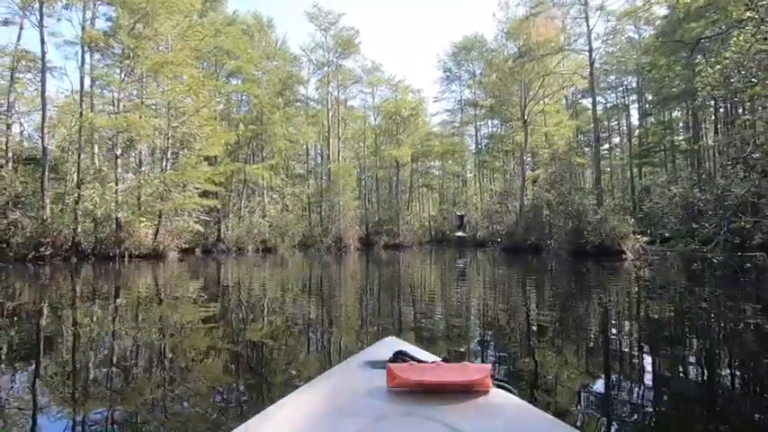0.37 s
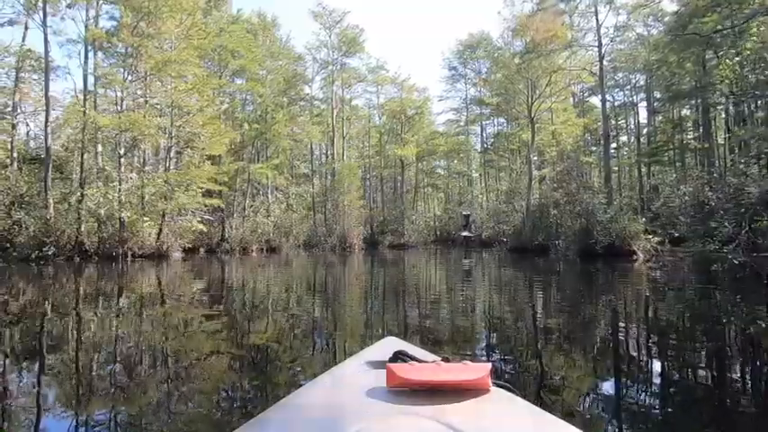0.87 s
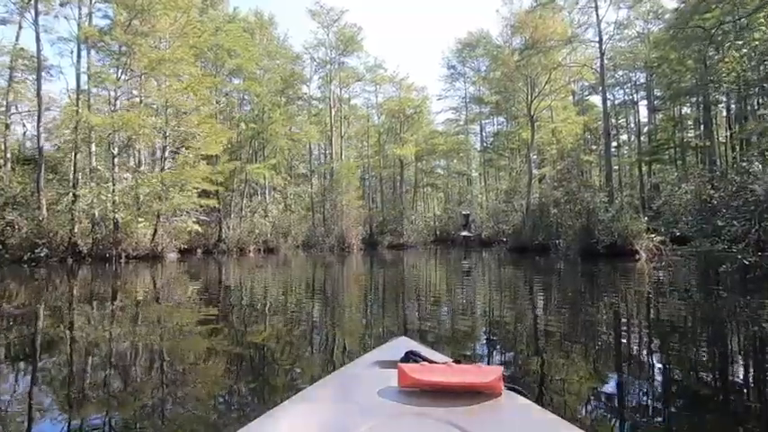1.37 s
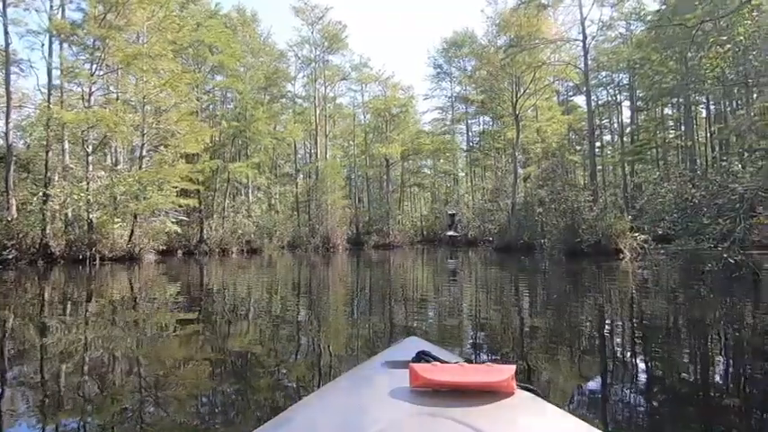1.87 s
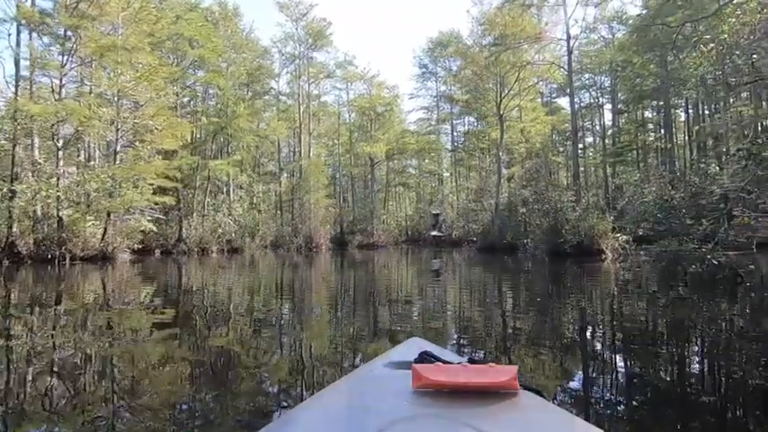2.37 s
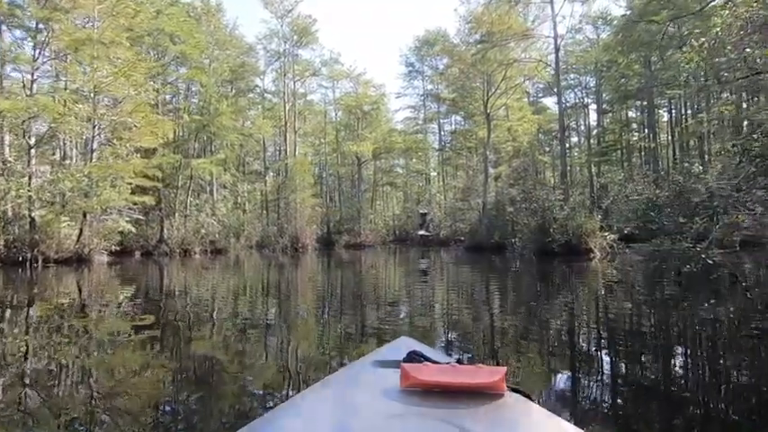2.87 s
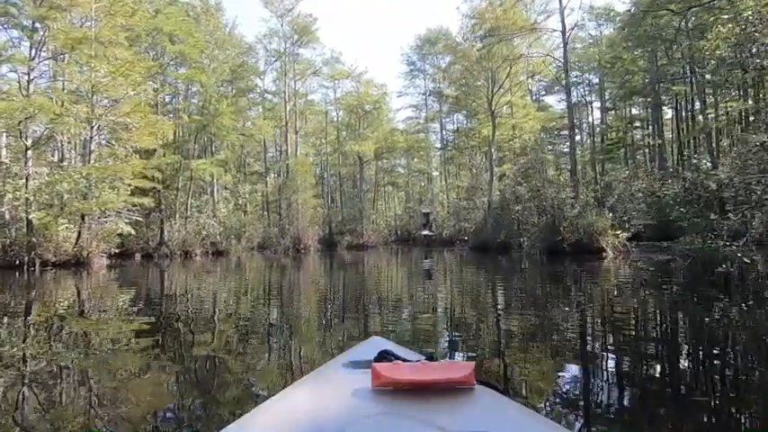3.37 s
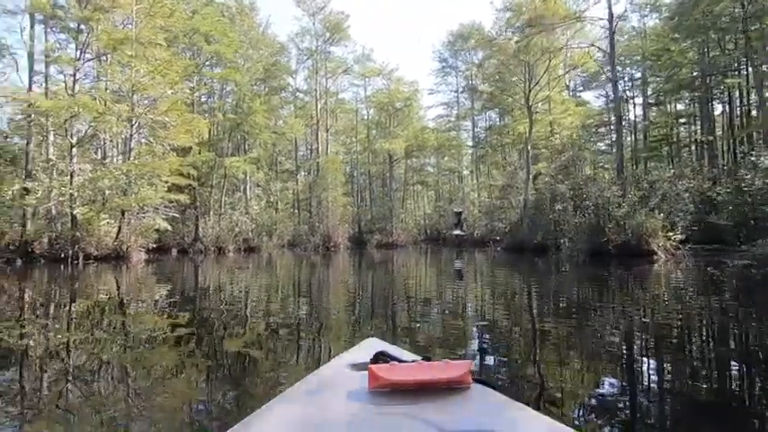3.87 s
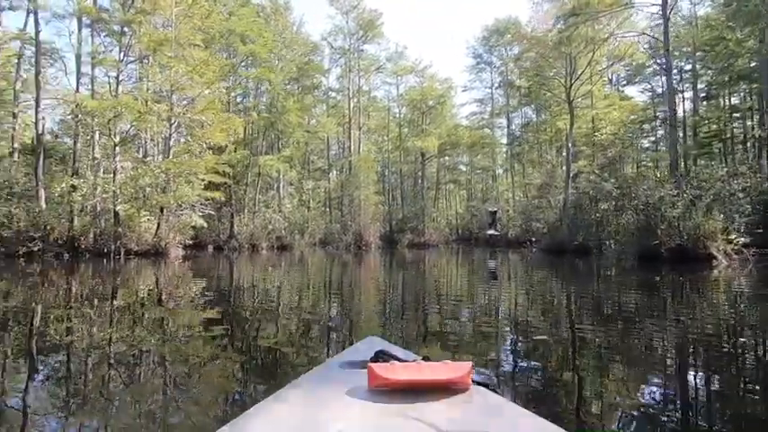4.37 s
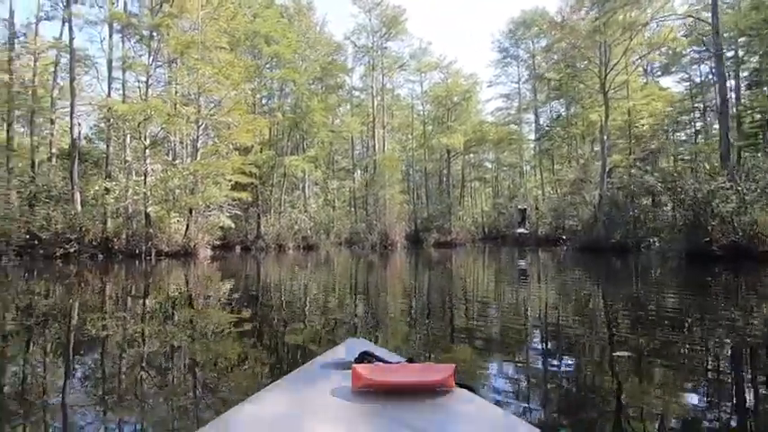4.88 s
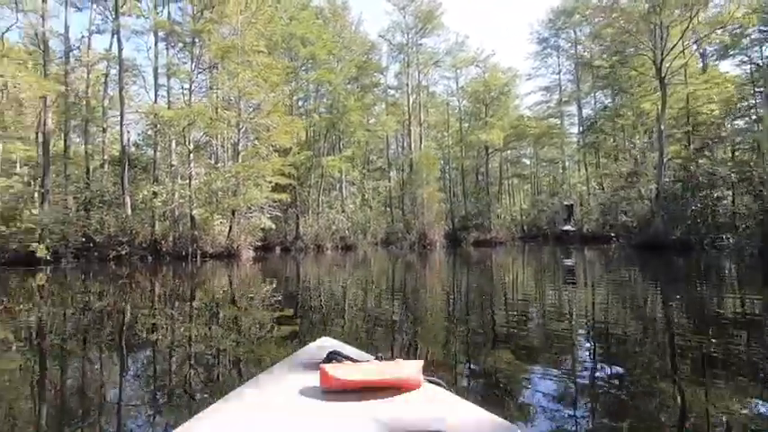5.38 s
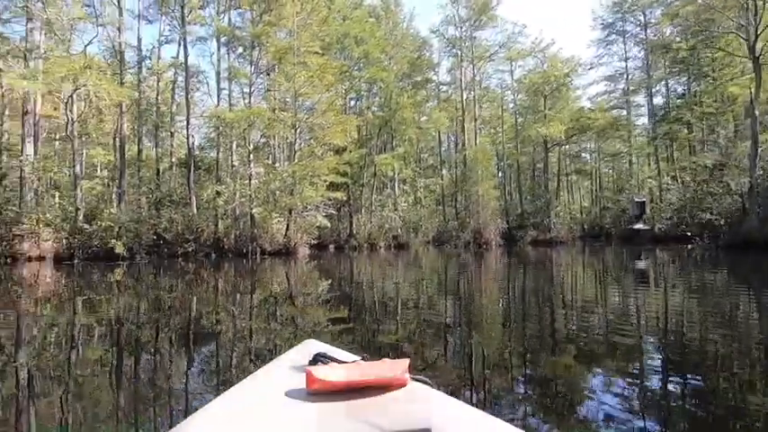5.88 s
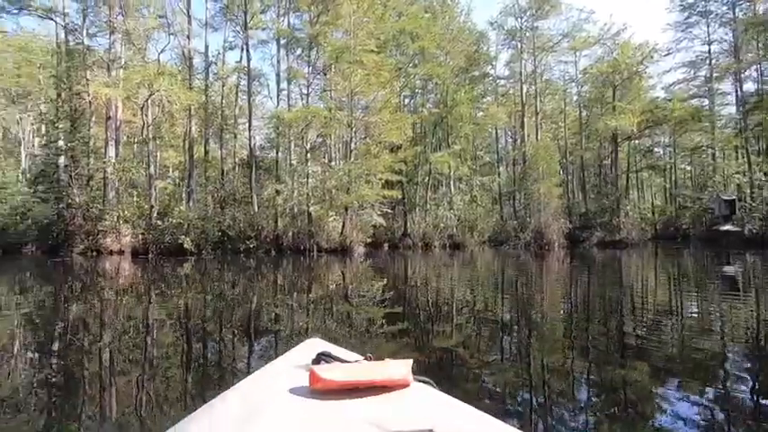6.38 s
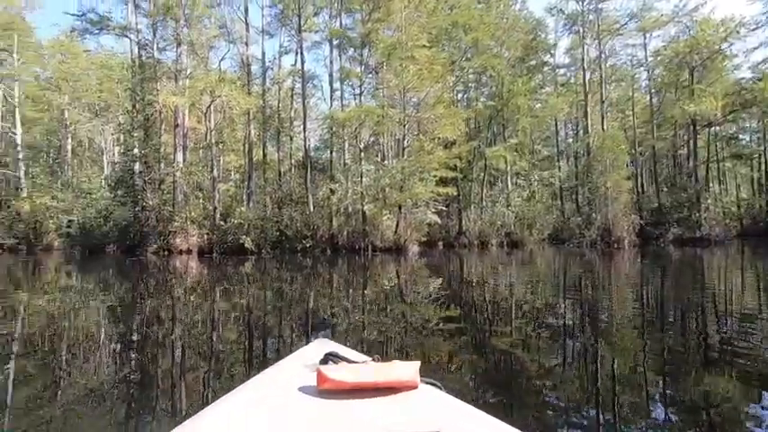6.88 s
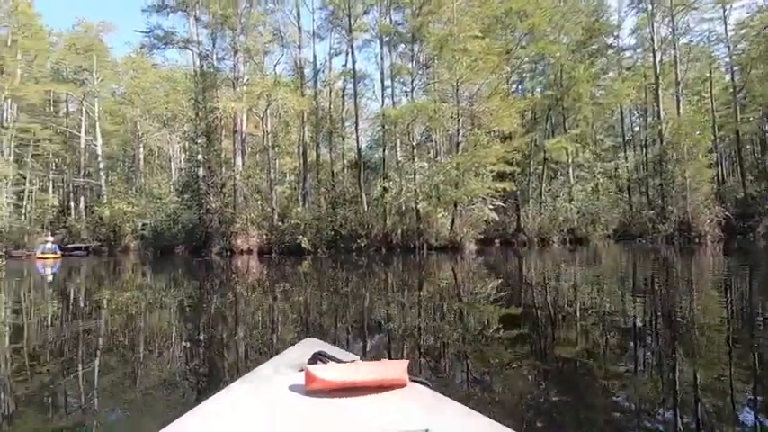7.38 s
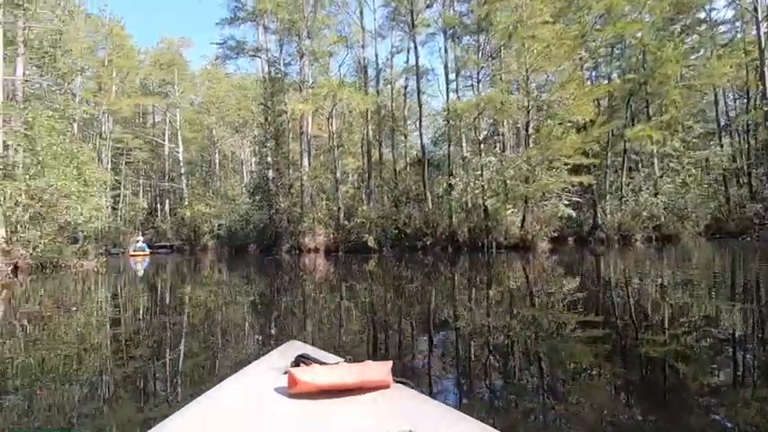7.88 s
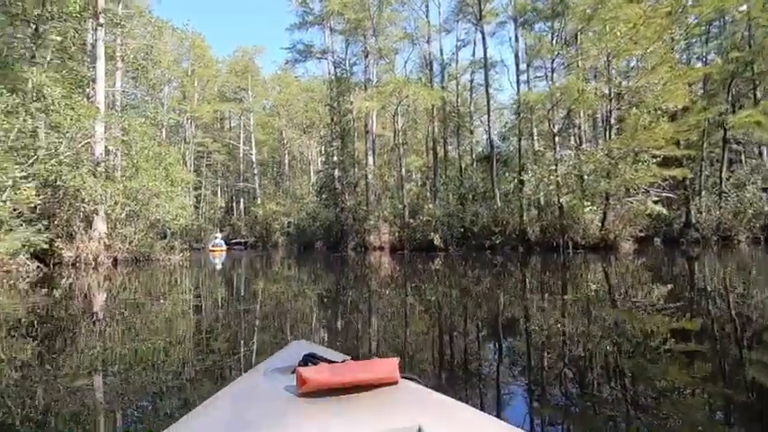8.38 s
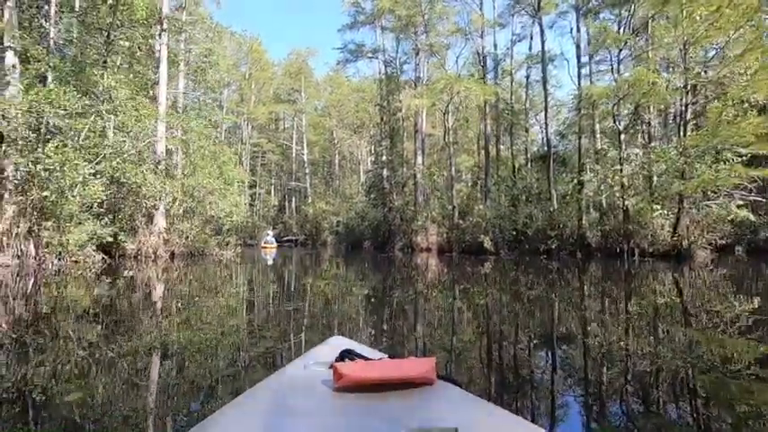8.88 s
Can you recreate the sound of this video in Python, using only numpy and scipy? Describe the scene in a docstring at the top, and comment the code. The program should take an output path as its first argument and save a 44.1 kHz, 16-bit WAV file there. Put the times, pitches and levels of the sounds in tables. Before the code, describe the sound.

Quiet low engine hum and dull rumble, then close paddle plops, bubbling swirls and scattered drips, ending with sharper splashes.

```python
"""A kayak paddle stirs, gurgles, splashes and drips in still swamp water, mostly on the right.
Bubbles are ringing sines, plops broad sagging pulses, spray and splashes clumped resonant grains.
A wash of shaped noise follows the gurgle. Two distant engines drone as near-pure orders that swell slowly,
over a dull rumble of low shaped noise; a thin, wide hiss of shaped noise hangs on top."""
import sys
import numpy as np
from scipy import signal
from scipy.fft import rfft, irfft, next_fast_len
from scipy.io import wavfile

SR = 44100
rng = np.random.default_rng(int(sys.argv[2]) if len(sys.argv) > 2 else 0)


def store_pcm(level_fs):
    """Save levels as 16-bit WAV."""
    pcm = np.round(np.clip(level_fs, -1, 1) * 32767).astype(np.int16)
    wavfile.write(sys.argv[1], SR, np.atleast_2d(pcm).T)


def amplitude_ratio(level_db):
    """Convert a level in decibels to the matching linear amplitude (field) ratio."""
    exponent = np.asarray(level_db, float) / 20
    return 10 ** exponent


N = 407484

# blade stirring the water: start_s, hold_s, gurgle_db, spray_db (gurgle before its shares)
STROKES = [(2.7, .06, -52, -59), (3.05, .18, -62, -73), (3.557, .2, -49, -58.5), (3.872, .15, -58, -62),
           (4.597, .19, -58, -61), (5.055, .13, -62, -69), (5.442, .13, -58, -74), (5.709, .39, -54, -62),
           (6.341, .1, -62, -76), (6.88, .18, -61, -67), (7.251, .19, -52.5, -99), (7.62, .1, -56.5, -93),
           (7.84, .35, -48, -56.5), (8.422, .05, -49, -54.5), (8.592, .12, -59, -62.5),
           (8.999, .2, -53, -60)]
# ripples along the hull between strokes: time_s, gurgle_db, spray_db (gurgle before its shares)
RIPPLES = [(0, -73, -98), (1.0, -71, -92), (1.9, -67, -70.5), (2.5, -65, -74), (4.3, -65, -82),
           (6.6, -65.5, -101), (9.24, -63, -90)]
# larger trapped bubbles and drops: time_s, peak_db, nominal_pitch_hz
DROPS = [(0.901, -47, 2030), (1.07, -58.5, 3200), (1.335, -58, 2840), (1.415, -56.5, 2340),
         (1.81, -54, 1120), (1.58, -51, 1900), (2.01, -55, 2070), (2.124, -43, 1880), (2.744, -45, 710),
         (2.761, -38.5, 1950), (2.763, -36, 1120), (2.776, -40.5, 2800), (2.905, -38.5, 2160),
         (2.919, -45.5, 2810), (3.037, -43.5, 925), (3.055, -48.5, 1330), (3.2, -44.5, 1800),
         (3.389, -42, 1100), (3.554, -39.5, 1630), (3.574, -39.5, 2070), (3.59, -36.5, 1910),
         (3.601, -39.5, 1240), (3.63, -37, 1360), (3.644, -36, 2070), (3.698, -37, 1110),
         (3.785, -44, 1270), (3.793, -31.5, 1290), (4.027, -38.5, 2460), (4.036, -45.5, 990),
         (4.151, -40.5, 1236), (4.645, -37.5, 1344), (4.744, -46, 525), (5.132, -40.5, 1210),
         (5.212, -45, 1340), (5.451, -50, 4040), (5.496, -39.5, 1156), (5.698, -42, 1660),
         (5.745, -43, 3080), (5.791, -41, 1250), (5.833, -42, 2600), (5.87, -48, 2670), (5.98, -41, 2110),
         (5.996, -45, 3430), (6.06, -44, 2300), (5.834, -39, 926), (5.857, -34, 1580), (5.964, -41, 1180),
         (6.046, -41, 974), (6.11, -45, 870), (7.049, -43.5, 856), (7.063, -41.5, 2260), (7.251, -33, 870),
         (7.344, -31, 1435), (7.427, -44, 785), (7.427, -35.5, 1740), (7.456, -35.5, 1145),
         (7.52, -48, 590), (7.601, -39.5, 1510), (7.629, -43.5, 1810), (7.861, -32.5, 1154),
         (7.857, -40, 2360), (7.868, -44, 2900), (7.872, -39, 1320), (7.898, -37, 1040),
         (7.909, -38.5, 1640), (7.959, -31, 1130), (7.967, -34.5, 2520), (8.03, -32.5, 1660),
         (8.057, -42, 740), (8.088, -45, 1530), (8.12, -35.5, 2910), (8.127, -28, 1566), (8.132, -34, 870),
         (8.182, -38.5, 1850), (8.431, -25, 1740), (8.435, -29, 1226), (8.441, -31, 2200),
         (8.539, -35.5, 3100), (8.997, -37.5, 723), (9.021, -43, 2900), (9.016, -40, 3900),
         (9.044, -40.5, 3660), (9.031, -44, 800), (9.116, -43, 2050), (9.164, -39, 1400)]
# hard plops: time_s, peak_db, start_pitch_hz
PLOPS = [(2.698, -31, 1500), (2.703, -30, 1100), (2.783, -23.5, 1570), (3.054, -32, 1340),
         (4.718, -41, 940), (5.064, -43, 1500), (5.075, -42, 1400), (5.1005, -26.5, 1350),
         (5.105, -24.5, 1660), (5.496, -36, 1100), (5.834, -39, 980), (7.25, -32, 2000), (7.318, -40, 1900),
         (7.34, -35, 1800), (7.426, -32.5, 910), (7.697, -39, 1650), (7.823, -34, 1400), (7.832, -24, 1980),
         (7.962, -25, 1090), (8.029, -23.5, 2200), (8.4296, -14.5, 3060), (8.432, -26, 1650),
         (8.448, -33, 1500), (9.006, -18, 3600), (9.026, -40, 2200)]
# bubbles gliding in pitch, mostly upward as they near the surface: time_s, peak_db, start_hz, end_hz, length_s
GLIDES = [(2.699, -30, 300, 420, 0.021), (2.712, -44, 390, 940, 0.068), (2.757, -38.5, 3670, 4000, 0.04),
          (2.952, -47, 500, 800, 0.023), (3.376, -51, 640, 1300, 0.042), (3.474, -49, 1667, 1830, 0.032),
          (3.687, -46, 955, 1260, 0.06), (3.788, -39, 1240, 1284, 0.042), (3.921, -48, 1990, 2320, 0.02),
          (5.938, -46.5, 837, 910, 0.062), (6.124, -50, 897, 1010, 0.059), (6.89, -45.5, 867, 890, 0.042),
          (7.339, -35.5, 950, 1500, 0.015), (7.363, -42, 1206, 2200, .024), (7.831, -37, 1730, 2510, .012),
          (7.868, -48, 544, 805, 0.07), (7.97, -43.5, 810, 860, .04), (8.034, -34, 1730, 2700, .012),
          (8.043, -44.5, 540, 740, .06), (8.133, -44, 858, 1000, 0.046), (8.434, -30, 348, 296, 0.022),
          (8.489, -39, 1204, 2320, 0.033), (8.75, -49.5, 1070, 1180, 0.037), (8.993, -43, 605, 850, 0.025)]
# blade or sheet of water breaking the surface: time_s, level_db, decay_60db_s, treble_re_body_db
SPLASHES = [(2.6992, -38.5, 0.093, -28), (2.722, -45, 0.1, -3), (2.76, -46, 0.039, -23),
            (2.789, -41.5, 0.076, -18), (3.0525, -52, 0.088, -32), (3.5526, -63, 0.094, -10),
            (4.035, -40, 0.051, -30), (5.1057, -49.5, 0.11, -40), (7.8336, -46.5, 0.43, -29),
            (7.9644, -51, 0.077, -27), (8.4248, -30.5, 0.044, -5), (8.445, -39.5, 0.068, 2),
            (8.484, -48, 0.14, 0), (8.9935, -47, 0.13, -22), (9.006, -30, 0.13, -17.5)]
# spray ticks: time_s, ping_db, centre_hz
TICKS = [(0.817, -51, 7550), (1.3394, -51, 7450), (1.6516, -53, 4650), (1.742, -45.5, 4380),
         (1.9046, -48, 8160), (2.0142, -46.5, 5000), (2.6955, -35.5, 4120), (2.7222, -51, 4130),
         (2.918, -42.5, 7500), (3.5528, -37, 8300), (3.6297, -42, 4050), (3.727, -45.5, 4660),
         (4.1579, -49, 3870), (4.577, -45, 6200), (4.6049, -48.5, 4400), (4.6242, -33.5, 8570),
         (4.7188, -41, 8800), (4.784, -36, 8040), (5.7415, -44, 4100), (5.8243, -44.5, 4800),
         (5.9403, -45, 4890), (6.0157, -45.5, 4600), (6.2907, -45, 6240), (6.7065, -46.5, 6550),
         (6.7476, -36.5, 8800), (6.8808, -48.5, 5130), (7.0652, -40.5, 9960), (7.0943, -46.5, 8500),
         (7.7707, -40, 3850), (7.856, -43.5, 4570), (7.8925, -40, 4580), (8.089, -40, 4600),
         (8.12, -42, 5070), (8.1668, -39.5, 4630), (8.287, -44.5, 5000), (8.327, -42, 7760),
         (8.4284, -26.5, 6550), (8.5302, -43, 5000), (8.9286, -50, 4900), (9.122, -47, 4030),
         (9.152, -43, 5100), (9.214, -39.5, 5130)]
# side of the paddle: time_s, left_over_right_db
PADDLE_SIDE = [(0, 4), (2.5, -0.5), (2.68, -14.5), (5, -22.5), (7.4, -23), (8.2, -18), (8.4, 7), (9.24, -1)]
# engine speeds: time_s, firing_rate_hz
SPEED_A = [(0, 36.6), (1.8, 36.62), (3.6, 36.33), (5.0, 36.4), (6.2, 36.24), (9.24, 35.04)]
SPEED_B = [(0, 22.49), (2.1, 23.01), (3.3, 23.03), (4.3, 22.86), (9.24, 20.84)]
# engine swells on the way through the air: time_s, to_third_order_db, higher_orders_db
SWELL_A = [(0, 3, 1), (0.71, -3.5, 5), (1.42, -2, 4.5), (2.84, -16.5, -4.5), (3.55, -3, 1),
           (4.26, -1.5, 2.5), (4.98, 7, 4), (5.69, 3, 2), (6.4, -1.5, 5.5), (7.11, 2.5, 7), (7.82, 2, 9.5),
           (8.53, 7, 7.5), (9.24, 9.5, -6)]
SWELL_B = [(0, 1.5, 10.5), (0.71, -1, 8.5), (1.42, -2, 3), (2.2, 0, 9.5), (2.84, 1.5, 0.5),
           (4.26, -4.5, -5), (5.3, -0.5, -14), (6.4, -12, -1), (7.11, -11, -3.5), (9.24, -4, -2)]
# engine orders: multiple_of_firing_rate
ORDERS_A = [2, 3, 4, 5, 16 / 3]
ORDERS_B = [2, 3, 4, 5, 6, 7, 9]
# order levels before swell and waver: level_db
ORDERS_A_DB = [-36.5, -39.5, -45.5, -53.5, -60]
ORDERS_B_DB = [-45, -45.5, -46, -40.5, -62.5, -52, -57]
# rumble spectrum shape: frequency_hz, density_db_per_hz
RUMBLE_SPECTRUM = [(25, -15), (45, -10.5), (70, -2.5), (110, 2.5), (160, -10), (220, -9), (320, -15.5),
                   (450, -33), (600, -35)]
# rumble level: time_s, level_db
RUMBLE_LEVEL = [(0.0, -39), (3.73, -42.5), (5.58, -37.5), (6.38, -42), (9.24, -36.5)]
# hiss spectrum shape: frequency_hz, density_db_per_hz
HISS_SPECTRUM = [(260, -18), (450, -1), (545, -7.5), (813, -1.5), (971, -5), (1470, -6.5), (3680, -28),
                 (5170, -24.5), (6750, -15), (7380, -12.5), (8180, -14.5), (9770, -11.5), (13500, -17.5),
                 (14800, -13), (15500, -34.5)]
# hiss swell over its base: time_s, gain_db
HISS_SWELL = [(0, 0.5), (2, 4.5), (5, 5.5), (9.24, 6)]

HISS_BASE_DB = -62.5
BUBBLE_SHARE_DB, WASH_SHARE_DB = -3.5, -7
ATTACK_DB_PER_S, RELEASE_DB_PER_S = 250.5, 90
RING_S, RING_CYCLES = 0.0078, 18.3  # a drop's 60 dB decay: this long plus so many cycles
PLOP_CYCLES, PLOP_SAG = 7.6, 0.14  # cycles to die by 60 dB; share of pitch lost meanwhile
PORT_HZ, PORT_WIDTH_HZ = 9840, 4000  # cavity before the left microphone


def stir():
    """Gurgle and spray levels in dB: each stroke rises, holds and dies away over the ripples."""
    t = np.arange(N) / SR
    power = amplitude_ratio(2 * np.array(in_time(RIPPLES)))
    for start_s, hold_s, gurgle_db, spray_db in STROKES:
        rise_db = -ATTACK_DB_PER_S * np.maximum(start_s - t, 0)
        fall_db = -RELEASE_DB_PER_S * np.maximum(t - start_s - hold_s, 0)
        peak_db = np.array([[gurgle_db], [spray_db]])
        power = power + amplitude_ratio(2 * peak_db) * amplitude_ratio(2 * (rise_db + fall_db))
    return 10 * np.log10(power)


def stirring(gurgle_db, spray_db):
    """Small bubbles gurgle with the stirring; fine spray crackles above."""
    spray = grains(500, 2500, 10000, cycles=30.0, spread_db=4.0)
    return gurgle(gurgle_db, count=1300) + amplitude_ratio(spray_db) * spray


def gurgle(gurgle_db, count):
    """Many small rising bubbles, born more often and louder where the water is stirred hardest."""
    out, draw = np.zeros(N), rng.random((count, 4))
    busy = np.cumsum(amplitude_ratio(1.1 * gurgle_db + 4.0 * drift(12.0)))
    born = np.searchsorted(busy / busy[-1], draw[:, 0])
    for i, (_, pitch, size, climb), shake in zip(born, draw, wobbles(count)):
        hz = 600 * 5.0 ** pitch
        level_db = 0.6 * gurgle_db[i] - 18 * size - 7.0 * pitch
        ring_s = 0.014 + 24 / hz
        add(out, i / SR, amplitude_ratio(level_db) * bubble(hz, ring_s, 0.87 * climb, shake))
    level = np.sqrt(np.mean(amplitude_ratio(gurgle_db) ** 2))
    return rms_one(out) * level * amplitude_ratio(BUBBLE_SHARE_DB)


def bubble(hz, ring_s, climb, shake):
    """A bubble swells within a few cycles and rings, rising in pitch, its wall wobbling."""
    t = np.arange(len(shake)) / SR
    phase = 2 * np.pi * np.cumsum(hz * (1 + climb * t / ring_s)) / SR + 3.34 * shake
    return np.sin(phase) * amplitude_ratio(-60 * t / ring_s) * (1 - np.exp(-t * hz / 2.2))


def wobbles(count):
    """Slow phase noise of bubble walls, one 60 ms row a bubble."""
    noise = rng.standard_normal((count, round(0.06 * SR)))
    return signal.lfilter([0.03], [1, -0.97], noise)


def splashes():
    """Short grains in a body and a treble band, gated on within a few milliseconds and dying away."""
    gate, bright = np.zeros(N), np.zeros(N)
    t = np.arange(round(0.15 * SR)) / SR
    for s, db, decay_s, treble_db in SPLASHES:
        burst = amplitude_ratio(db) * amplitude_ratio(-60 * t / decay_s) * (1 - np.exp(-t / 0.00059))
        add(gate, s - 0.001, burst)
        add(bright, s - 0.001, burst * amplitude_ratio(treble_db))
    body = grains(1500, 600, 4500, cycles=12.0, spread_db=4.0)
    treble = grains(3500, 7000, 8700, cycles=5.7, spread_db=-3.0)
    return gate * body + bright * treble


def drops():
    """The larger bubbles, one by one; deeper-pitched ones ring longer."""
    out = np.zeros(N)
    for (s, db, hz), shake in zip(DROPS, wobbles(len(DROPS))):
        # starts a little flat, then climbs
        sound = bubble(hz * 0.978, RING_S + RING_CYCLES / hz, 0.23, shake)
        add(out, s - 0.0005, amplitude_ratio(db) * sound / np.abs(sound).max())
    return out


def plops():
    """A cavity closes at once: a broad pulse of a few cycles, sagging in pitch."""
    out, t = np.zeros(N), np.arange(round(0.02 * SR)) / SR
    for s, db, hz in PLOPS:
        u = t * hz / PLOP_CYCLES
        phase = 2 * np.pi * hz * t * (1 - PLOP_SAG * np.minimum(u, 1) / 2)
        pulse = np.sin(phase) * amplitude_ratio(-60 * u) * (1 - np.exp(-t * hz / 0.48)) ** 2
        add(out, s - 0.5 / hz, amplitude_ratio(db) * pulse / np.abs(pulse).max())
    return out


def ticks():
    """Spray ticks: a damped ping and a little broad noise, cut at 10 ms."""
    out, t = np.zeros(N), np.arange(round(0.01 * SR)) / SR
    noise = signal.lfilter([1, 0, -1], [1, -0.8, 0.5], rng.standard_normal((len(TICKS), len(t))))
    for (s, db, hz), spatter in zip(TICKS, noise):
        ping = np.sin(2 * np.pi * hz * t) * amplitude_ratio(-60 * t * hz / 77.0)
        spatter = amplitude_ratio(-13.5) * spatter * amplitude_ratio(-60 * t / 0.025)
        add(out, s, amplitude_ratio(db) * (ping + spatter))
    return out


def glides():
    """A sine swept between two pitches under a rounded swell, its wall wobbling."""
    out = np.zeros(N)
    for (s, db, start_hz, end_hz, length_s), shake in zip(GLIDES, wobbles(len(GLIDES))):
        u = np.linspace(0, 1, min(round(length_s * SR), len(shake)))
        hz = start_hz * (end_hz / start_hz) ** u
        sweep = np.sin(2 * np.pi * np.cumsum(hz) / SR + 4.6 * shake[:len(u)])
        add(out, s, amplitude_ratio(db) * sweep * np.sin(np.pi * u ** 0.44) ** 2)
    return out


def grains(per_s, low_hz, high_hz, cycles, spread_db):
    """Random clicks in clumps, dealt to 12 short resonators spread in pitch; rms 1."""
    sizes = amplitude_ratio(spread_db * np.minimum(rng.exponential(1, N), 5)) * rng.choice([-1, 1], N)
    born = rng.random(N) < per_s * amplitude_ratio(5.0 * drift(15.0)) / SR
    dealt, out = rng.integers(0, 12, N), 0
    for k, hz in enumerate(np.geomspace(low_hz, high_hz, 12)):
        r, w = amplitude_ratio(-60 * hz / (cycles * SR)), 2 * np.pi * hz / SR  # 60 dB down after the cycles
        clicks = sizes * born * (dealt == k) / np.sin(w) + 1e-18
        out = out + signal.lfilter([np.sin(w), 0, -np.sin(w)], [1, -2 * r * np.cos(w), r * r], clicks)
    return rms_one(out)


def place(x, pan_db):
    """Pan in dB; the left port's cavity acts as an all-pass, half a cycle late at its resonance."""
    r = np.exp(-np.pi * PORT_WIDTH_HZ / SR)
    poles = [1, -2 * r * np.cos(2 * np.pi * PORT_HZ / SR), r * r]
    turned = signal.lfilter(poles[::-1], poles, x)
    left, right = amplitude_ratio(pan_db / 2), amplitude_ratio(-pan_db / 2)
    return np.array([turned * left, x * right]) * 2 / (left + right)


def wash(gurgle_db):
    """Wide noise of stirred water, following the gurgle level."""
    spectrum = [(500, -4.5), (1000, 1.5), (2000, 0.5), (4000, -13), (9000, -21)]  # Hz, dB per Hz
    return amplitude_ratio(gurgle_db + WASH_SHARE_DB) * coloured(spectrum, alike=0.62)


def engine(speed, swell, orders, orders_db, waver_db):
    """Near-pure orders of the firing rate, each wavering on its long way through the air."""
    (hz,), (low_db, upper_db) = in_time(speed), in_time(swell)
    turn = 2 * np.pi * np.cumsum(hz) / SR
    out = 0
    for k, db in zip(orders, orders_db):
        level_db = db + (upper_db if k > 3 else low_db) + waver_db * drift(4.4)
        phase = k * turn + 0.27 * drift(1.67) + rng.uniform(0, 2 * np.pi)
        out = out + np.sqrt(2) * amplitude_ratio(level_db) * np.sin(phase)
    return out


def rumble():
    """Dull low noise, nearly alike on both sides."""
    return amplitude_ratio(in_time(RUMBLE_LEVEL)[0]) * coloured(RUMBLE_SPECTRUM, alike=0.96)


def hiss():
    """Thin noise, nearly unrelated left to right."""
    return amplitude_ratio(HISS_BASE_DB + in_time(HISS_SWELL)[0]) * coloured(HISS_SPECTRUM, alike=0.039)


def coloured(spectrum, alike):
    """Stereo noise of a given spectrum and left-right likeness; rms 1."""
    size = next_fast_len(N, real=True)
    hz = np.arange(size // 2 + 1) * SR / size + 1
    at_hz, db = np.transpose(spectrum)
    shape = amplitude_ratio(np.interp(np.log(hz), np.log(at_hz), db, left=-90, right=-90))
    mid, side = irfft(rfft(rng.standard_normal((2, size))) * shape, size)[:, :N]
    return rms_one(np.sqrt(1 + alike) * mid + np.sqrt(1 - alike) * side * [[1], [-1]])


def drift(rate_hz):
    """Slow random wander of spread 1: noise through two equal poles, drawn every 40 samples."""
    r = np.exp(-80 * np.pi * rate_hz / SR)
    noise = rng.standard_normal(N // 40 + 2002)
    slow = signal.lfilter([1], [1, -2 * r, r * r], noise)[2000:]  # drop the settling
    return np.interp(np.arange(N) / 40, np.arange(len(slow)), rms_one(slow - slow.mean()))


def rms_one(x):
    """Scale to rms 1."""
    return x / np.sqrt(np.mean(x ** 2) + 1e-20)


def in_time(rows):
    """Columns of a table, read at every sample."""
    s, *columns = np.transpose(rows)
    return [np.interp(np.arange(N) / SR, s, c) for c in columns]


def add(out, s, sound):
    """Lay a short sound into the track at its time."""
    i = round(s * SR)
    out[i:i + len(sound)] += sound[:N - i]


def scene():
    """Water on the paddle's side, wash spread wide; engines, rumble and hiss about the middle."""
    gurgle_db, spray_db = stir()
    water = stirring(gurgle_db, spray_db) + splashes() + drops() + plops() + ticks() + glides()
    drone = engine(SPEED_A, SWELL_A, ORDERS_A, ORDERS_A_DB, waver_db=2.1)
    drone = drone + engine(SPEED_B, SWELL_B, ORDERS_B, ORDERS_B_DB, waver_db=1.3)
    background = (drone + rumble() + hiss()) * amplitude_ratio(np.array([[-0.3], [0.3]]))
    return place(water, in_time(PADDLE_SIDE)[0]) + wash(gurgle_db) + background


def top_cut(x):
    """Nothing passes above the cut-off."""
    return signal.sosfilt(signal.butter(12, 15610, fs=SR, output="sos"), x)


def record(dry):
    """The microphones fade in the top octave."""
    dull = signal.sosfilt(signal.butter(2, 11000, fs=SR, output="sos"), dry)
    return top_cut(dull)


dry = scene()
out = record(dry)
store_pcm(out)
```